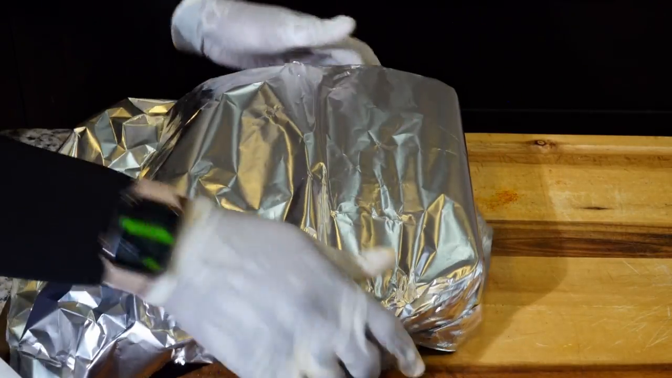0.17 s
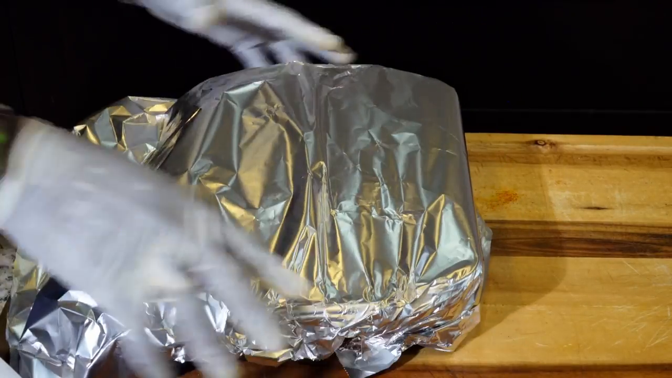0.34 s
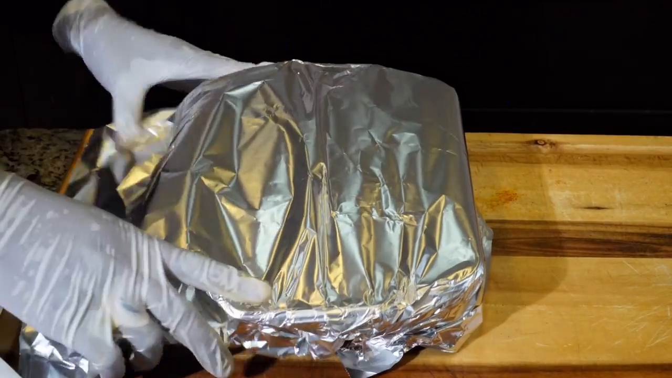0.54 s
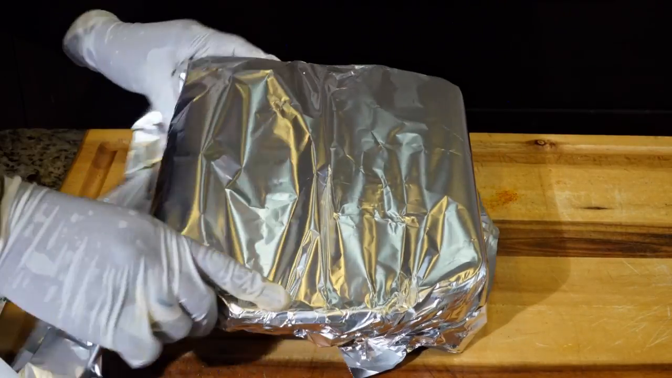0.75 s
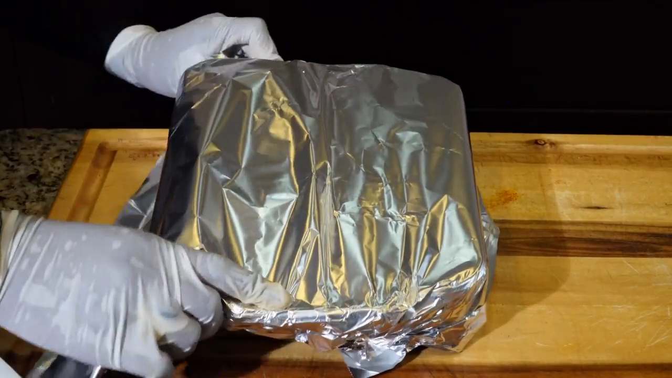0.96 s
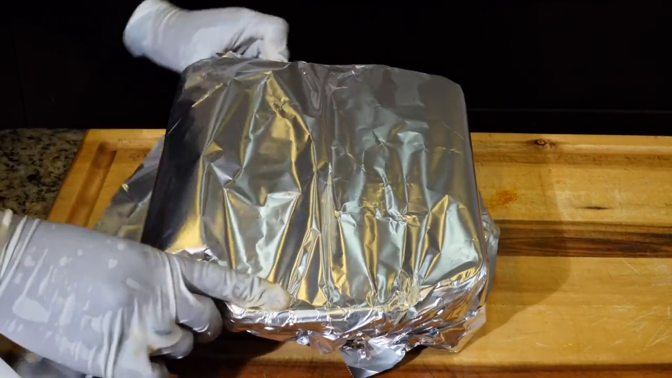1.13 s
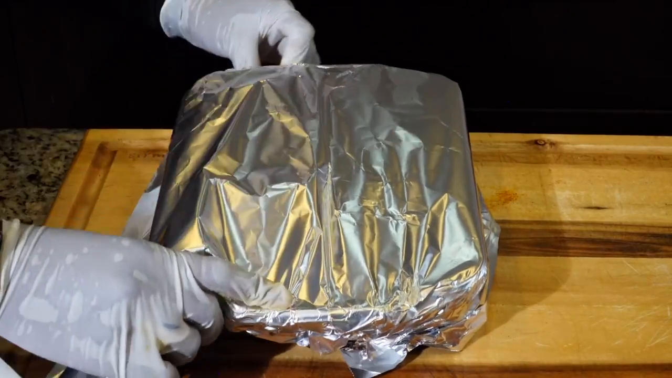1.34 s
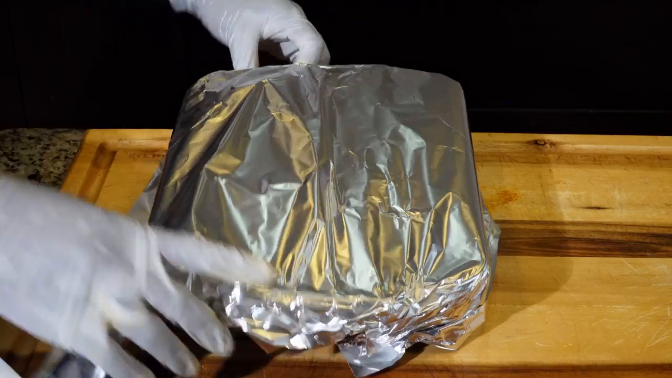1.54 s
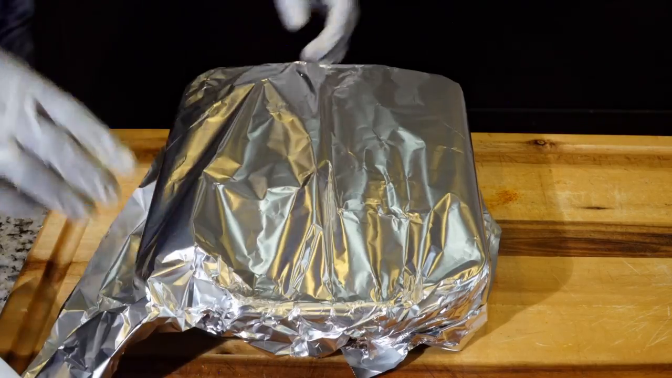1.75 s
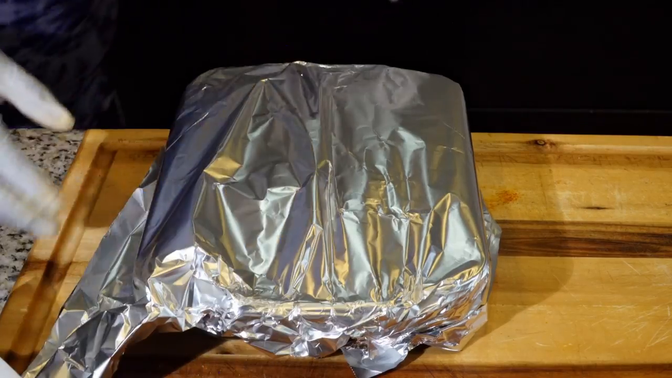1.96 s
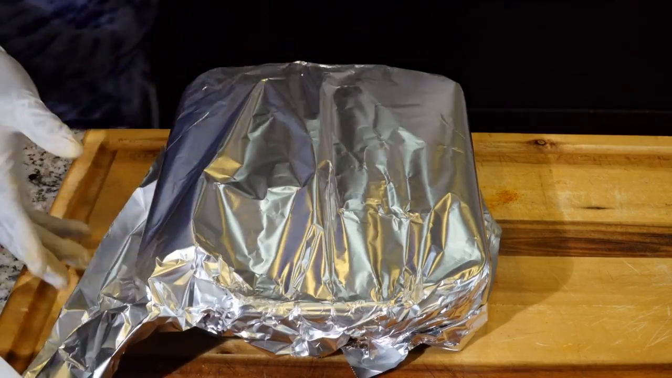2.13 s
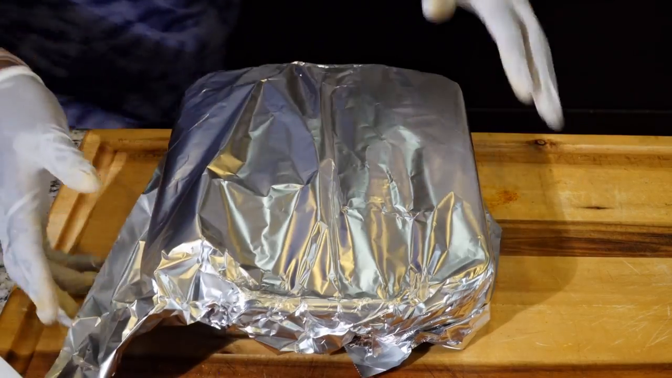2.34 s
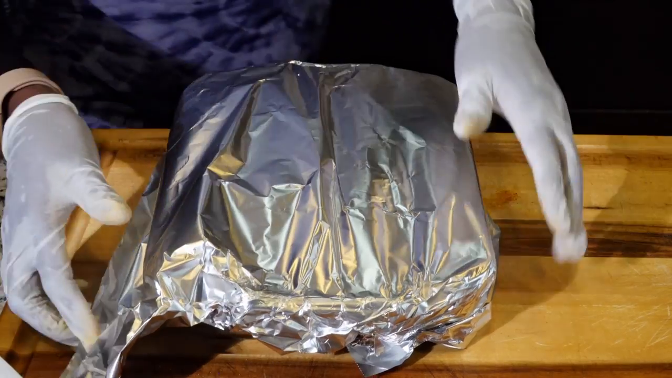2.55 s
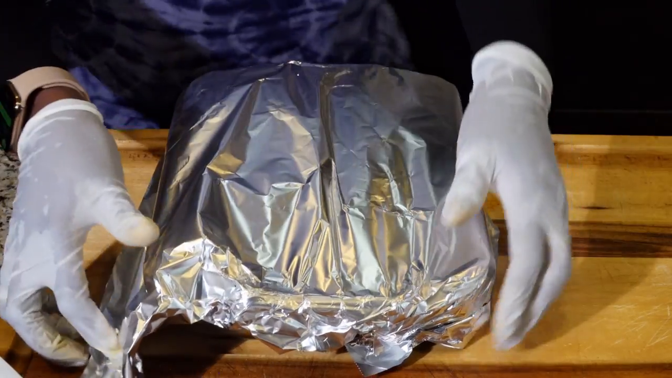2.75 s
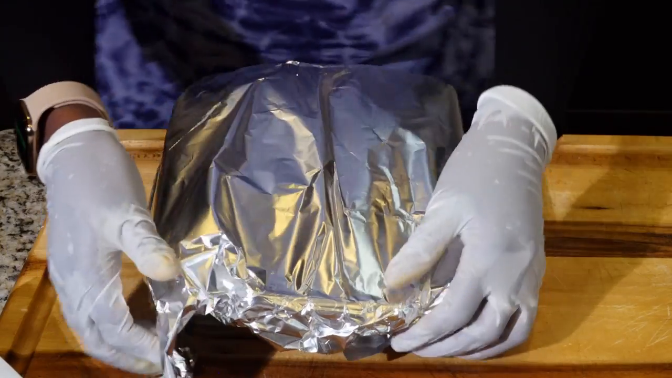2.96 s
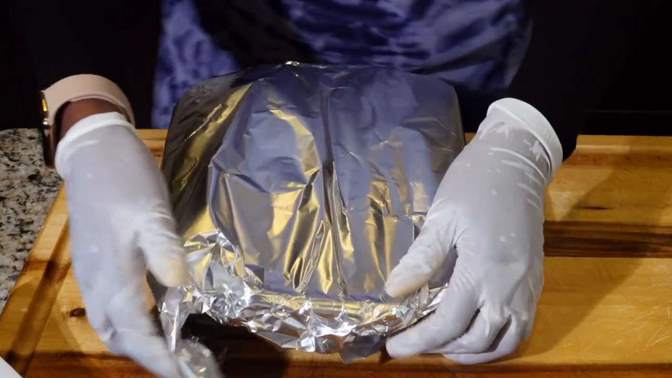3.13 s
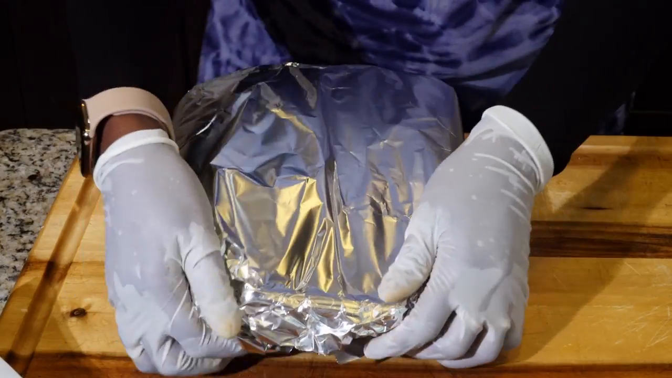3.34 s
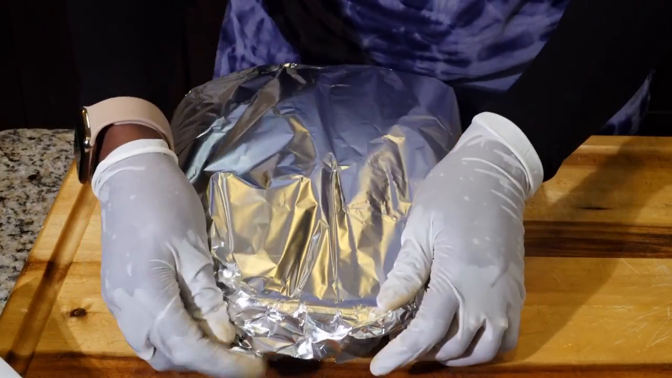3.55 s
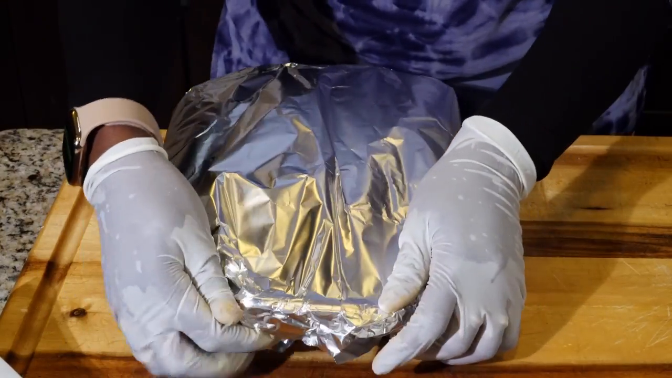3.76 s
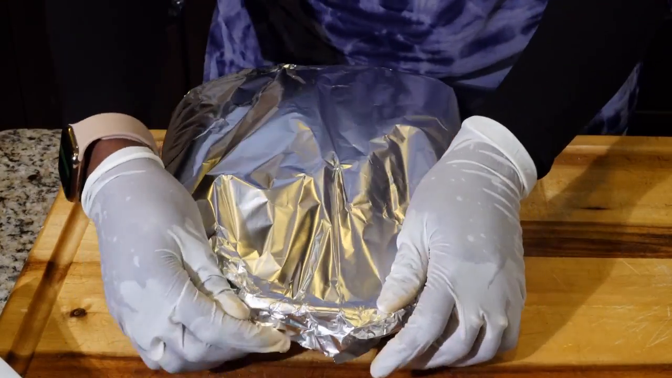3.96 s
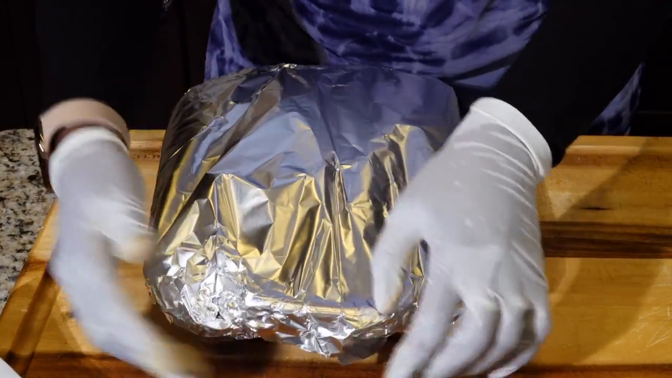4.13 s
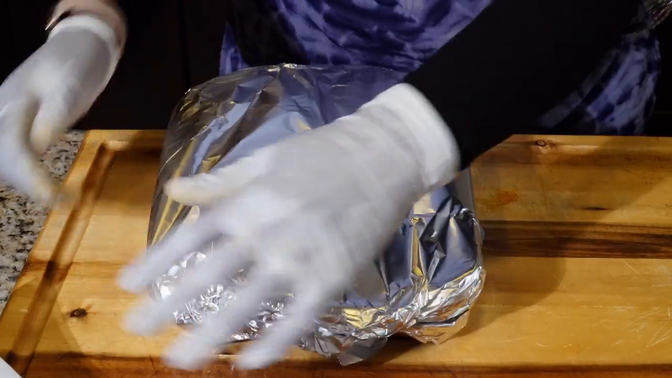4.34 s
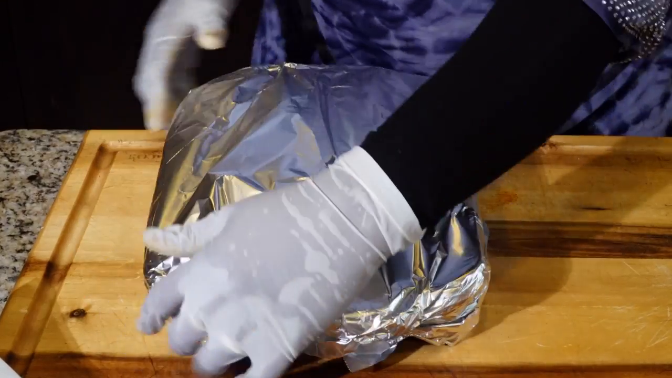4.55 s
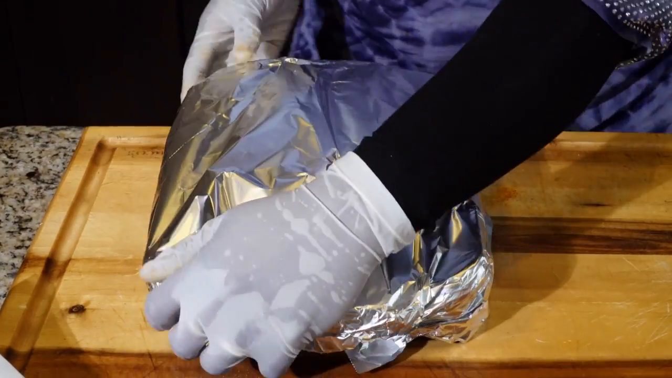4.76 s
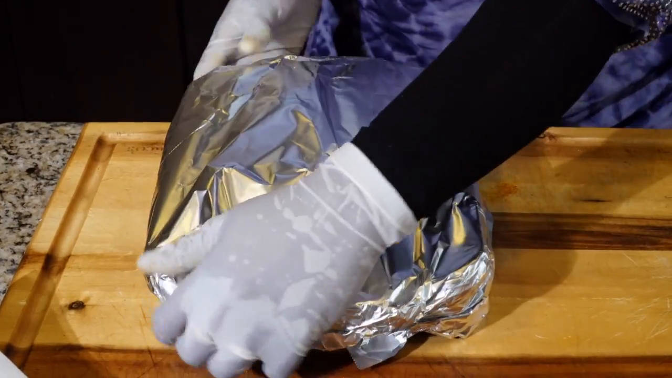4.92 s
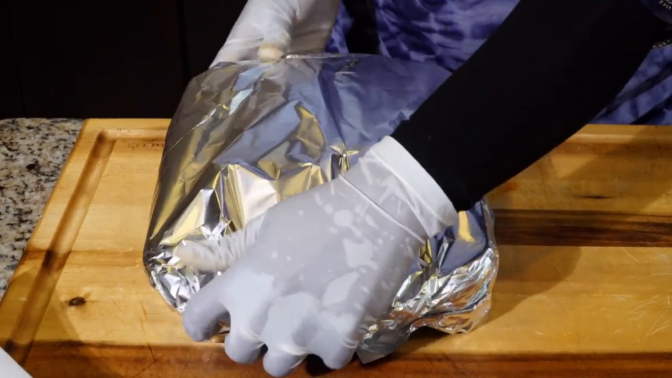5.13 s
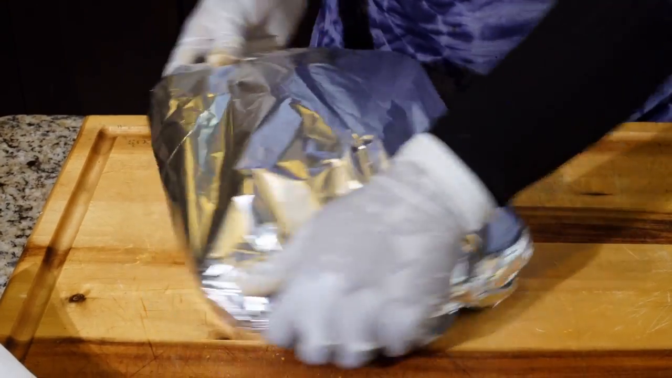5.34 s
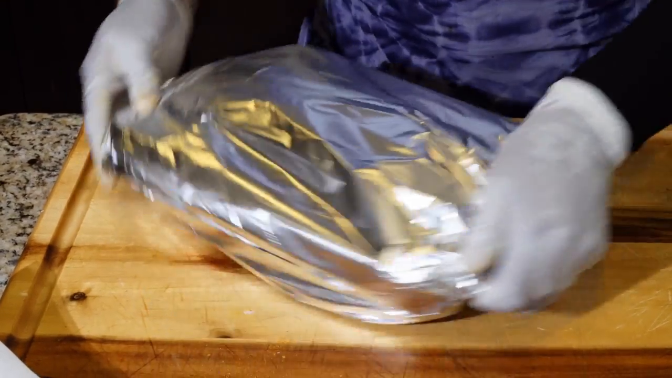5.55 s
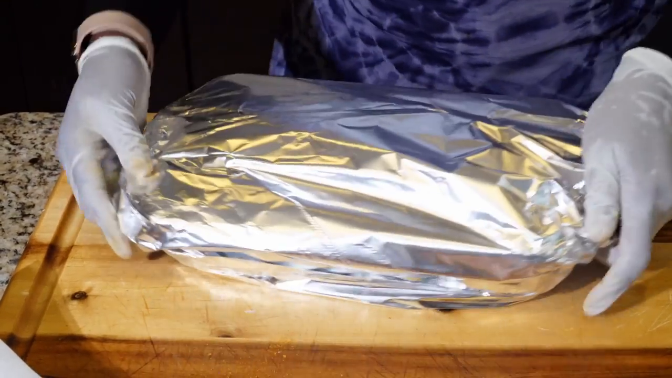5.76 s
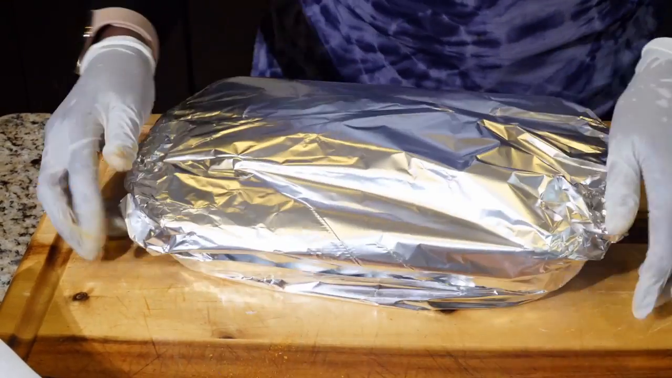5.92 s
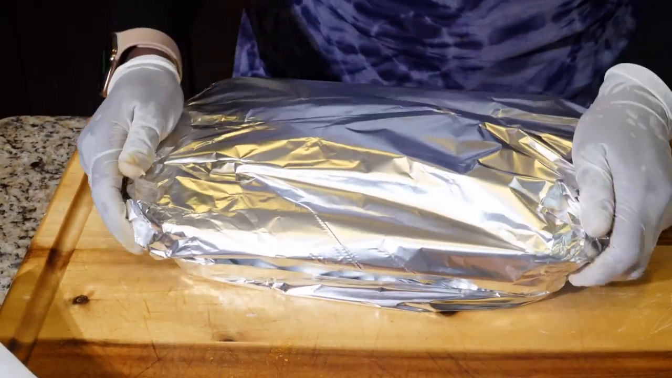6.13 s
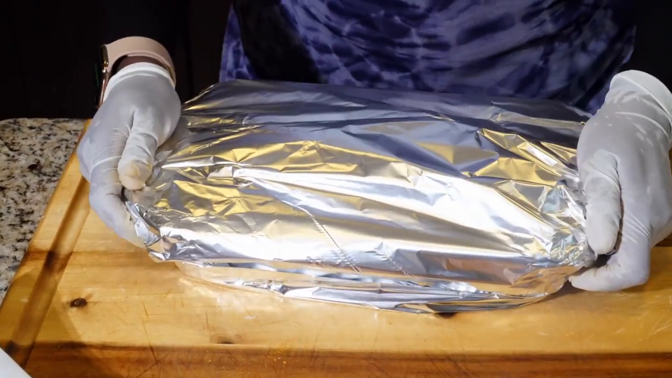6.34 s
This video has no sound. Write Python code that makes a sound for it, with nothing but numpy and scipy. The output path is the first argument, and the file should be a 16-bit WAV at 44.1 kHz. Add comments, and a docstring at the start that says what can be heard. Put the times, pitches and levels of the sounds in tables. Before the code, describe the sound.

Close, bright foil rustling in short uneven bursts, thinning to small crackles, before a covered dish slides across a wooden board and clunks down.

```python
"""Wrapping a glass dish in foil

Gloved hands pull aluminium foil over a glass baking dish, crimp it round the rim and press it flat.
The foil is shaped noise with many tiny pops; larger creases, flips and a singing fold are added one by one.
The wrapped dish is then swung round on a wooden board: scraping noise, and one knock that rings the glass.
A small kitchen adds a short tail and a low hum; the left channel is louder than the right."""
import sys
import numpy as np
from scipy import signal
from scipy.fft import rfft, irfft, next_fast_len
from scipy.io import wavfile
from scipy.ndimage import uniform_filter1d, map_coordinates

SR = 44100
rng = np.random.default_rng(int(sys.argv[2]) if len(sys.argv) > 2 else 0)


def transcribe(u):
    """Save the signal u as a 16-bit wav file named by the first command-line argument.

    u: samples, shape (n,) or (channels, n), limited to [-1, 1]; the rate is SR.
    q: integer samples, one column per channel.
    """
    v = np.clip(np.atleast_2d(u).T, -1, 1)
    q = np.round(v * 32767).astype(np.int16)
    wavfile.write(sys.argv[1], SR, q)


N = 281791  # length of the scene in samples

# All levels are relative: they come before the mixing gains and the left/right balance.
# Tone of the kitchen hum: pitch_hz, level_db
HUM_TONE = [(12, -36), (20, -28), (77, 7.5), (107, 3.5), (172, -6), (347, -11), (422, -22), (678, -13.5),
            (1000, -20.5), (1530, -19.5), (1660, -22), (8180, -45), (13500, -33), (16000, -47)]
# How long the kitchen tail takes to fall by 60 dB: pitch_hz, decay_s
ROOM_DECAY = [(200, 0.37), (2000, 0.11), (14000, 0.23)]
# Soft bumps of the dish on the board: start_s, level_db, pitch_hz
BUMPS = [(0.62, -27, 118), (0.808, -30, 67.3), (1.94, -31, 159), (1.985, -26, 120), (2.055, -31, 91.5),
         (2.541, -30, 45.8), (4.434, -24, 54.3), (4.574, -32, 87), (5.682, -24.5, 82.4)]
# The whole sheet flexes, under a palm or as the dish lands: start_s, length_s, level_db
FLEXES = [(0.0, 0.04, -44), (0.53, 0.082, -35), (0.78, 0.11, -36.5), (1.22, 0.067, -35), (1.92, 0.083, -35),
          (2.09, 0.06, -43.5), (2.39, 0.16, -46.5), (2.55, 0.067, -35.5), (2.96, 0.1, -40),
          (3.9, 0.039, -40.5), (4.42, 0.097, -35), (4.57, 0.059, -32), (5.18, 0.029, -32),
          (5.675, 0.035, -35.5)]
# Tone of the dull flutter: pitch_hz, level_db
FLUTTER_TONE = [(20, -4), (60, -5.5), (130, 0), (300, -4), (550, -11), (1200, -21), (3000, -68)]
# The dish slides on the board, one list per push: time_s, scrape_level_db, hiss_level_db
SLIDES = [
    [(5.3, -37, -72), (5.37, -29.5, -20.5), (5.41, -29, -18.5), (5.44, -26.5, -21.5), (5.465, -29, -15.5),
     (5.54, -31, -15), (5.575, -37, -34)],
    [(5.735, -56, -35), (5.755, -31.5, -20.5), (5.815, -31, -26), (5.87, -43, -41)],
]
# Tone of the foil scraping on wood: pitch_hz, level_db
SCRAPE_TONE = [(180, -52), (300, -26), (398, -46), (455, -11), (546, 2), (645, -10), (762, -1), (1930, -5),
               (2280, -8), (2700, 0.5), (4750, -19.5), (6960, -13.5), (8090, -13), (15000, -9),
               (16000, -16)]
# The dish comes down: start_s, level_db
KNOCKS = [(5.682, -4.5)]
# Ringing tones of the glass dish on the board: pitch_hz, level_db, time_to_fall_60_db_s
DISH_RING = [(355, -27, 0.25), (451.5, -4.5, 0.21), (442.3, -15.5, 0.53), (483, -12.5, 0.47),
             (553, -24, 0.67), (634, -25, 0.66), (715, -26, 0.38), (838, -10.5, 0.17), (942, -15, 0.13),
             (1139, -13, 0.11), (1200, -15, 0.19), (1280, -13, 0.13), (1350, -16, 0.28), (1540, -33, 0.084),
             (1920, -25, 0.1)]
# Tones of the board's thud and of the hard clack: pitch_hz, level_db
BOARD_TONE = [(40, -36), (90, -23), (250, -38), (440, -6), (700, -9), (1500, -3.5), (1900, -30),
              (5000, -36)]
CLACK_TONE = [(150, -32), (500, -4), (1500, 5), (2000, -6.5), (5000, -16.5), (16000, -39)]
# A glove drags along a taut fold, which sings hoarsely: time_s, pitch_hz, level_db
DRAG_PATH = [(2.64, 1550, -52), (2.76, 1640, -50), (2.919, 1720, -49), (3.08, 2000, -36)]
# A broad panel of the sheet flips over with one dull pop: start_s, peak_db, corner_hz
PANEL_POPS = [(2.1205, -17.5, 750), (4.0815, -21, 1200), (4.295, -26, 1400)]
# Single creases that snap through: start_s, level_db, facet_pitch_hz
CREASE_SNAPS = [(0.13, -24, 2650), (0.277, -17, 7150), (0.898, -9, 1790), (0.998, -14.5, 7000),
                (1.108, -10, 770), (1.291, -11.5, 1090), (1.353, -13.5, 4900), (2.477, -26.5, 3360),
                (3.008, -23, 14000), (3.168, -24.5, 4000), (3.738, -20.5, 2140), (4.7, -14, 2530),
                (4.789, -17, 2430), (4.819, -14.5, 2120), (4.882, -14.5, 2130), (4.901, -13, 2690),
                (4.974, -12.5, 2600), (5.078, -10, 1800), (5.081, -13, 2700), (5.106, -12.5, 13800),
                (5.148, -15.5, 2030), (5.168, -14.5, 1240), (5.604, -22, 2540), (5.834, -1.5, 13100),
                (6.195, -14, 2900), (6.339, -14, 2700)]
# How firmly the hands lean on the foil between strokes: time_s, level_db
GRIP = [(0.0, -34), (0.3, -41), (0.42, -53), (0.9, -29), (1.33, -35), (1.7, -39), (1.82, -55),
        (2.26, -60.5), (2.35, -49), (2.85, -43.5), (3.3, -36), (4.2, -47.5), (4.34, -59), (4.5, -38),
        (5.92, -38), (6.04, -58.5), (6.14, -36), (6.39, -36.5)]
# A hand pulls, pinches or smooths the foil: start_s, length_s, level_db, crackle_over_buckling_db
STROKES = [(0.0, 0.013, -29.5, -0.5), (0.11, 0.089, -30, -1), (0.22, 0.063, -34, 1.5),
           (0.53, 0.35, -27.5, 4.5), (1.15, 0.2, -30.5, 3.5), (1.555, 0.038, -40, 7.5),
           (1.62, 0.074, -33.5, 5), (1.77, 0.089, -65.5, 8.5), (1.925, 0.069, -40.5, -4),
           (2.325, 0.047, -44, 0), (2.465, 0.056, -46.5, 6), (2.55, 0.057, -38, -2), (2.885, 0.12, -38, 4),
           (2.985, 0.14, -30.5, 0), (3.24, 0.1, -36, 2.5), (3.41, 0.14, -33.5, -3),
           (3.685, 0.076, -38.5, -4), (3.845, 0.11, -36.5, -1.5), (4.08, 0.082, -35, -3),
           (4.17, 0.16, -50.5, -26), (4.415, 0.06, -41, -1.5), (4.575, 0.15, -29, -3.5),
           (4.75, 0.063, -33.5, 2), (4.87, 0.035, -32, 1), (4.955, 0.043, -33, -2), (5.095, 0.029, -35, 2),
           (5.17, 0.17, -34, 5), (5.59, 0.024, -38.5, 9.5), (5.88, 0.053, -30, -2.5),
           (6.145, 0.062, -33.5, 1.5)]
# A whole fold collapses under a finger: start_s, length_s, level_db, crackle_over_buckling_db
CRUNCHES = [(0.078, 0.027, -44, 11.5), (0.497, 0.034, -34.5, 2.5), (0.545, 0.024, -27, 3),
            (0.627, 0.017, -24.5, 8), (0.71, 0.034, -37, 13.5), (0.801, 0.018, -23.5, 2),
            (0.842, 0.011, -29.5, 5), (1.058, 0.043, -31.5, 2), (1.244, 0.037, -24, 4),
            (1.29, 0.022, -24.5, 2), (1.433, 0.0087, -36.5, 9), (2.11, 0.025, -50, -8),
            (2.277, 0.077, -53, 6.5), (2.692, 0.029, -37.5, -1.5), (2.812, 0.0094, -33.5, -1),
            (2.889, 0.021, -36.5, 3.5), (3.008, 0.0041, -29.5, 6.5), (3.165, 0.0041, -36, 8.5),
            (3.433, 0.015, -29.5, 2.5), (3.492, 0.034, -35.5, 4.5), (3.597, 0.032, -38, 5),
            (3.733, 0.013, -30, -3.5), (3.912, 0.019, -30.5, 1), (3.983, 0.012, -35, -1.5),
            (4.12, 0.012, -27, -2.5), (4.168, 0.025, -35, -2), (4.578, 0.035, -29, 4.5),
            (4.683, 0.022, -33, 2), (4.834, 0.014, -37.5, 11.5), (4.974, 0.0097, -25, 5.5),
            (5.005, 0.0086, -27.5, -2), (5.078, 0.0043, -21.5, -9), (5.249, 0.014, -40, 16),
            (6.077, 0.021, -38.5, -5.5), (6.254, 0.016, -33, 6), (6.299, 0.021, -36, 5)]
# Tones of the loose, the crimped and the taut foil: pitch_hz, level_db
LOOSE_TONE = [(150, -34), (250, -20), (460, -6), (662, -3.5), (816, -3.5), (1010, -0.5), (1790, 1),
              (2960, -2.5), (4900, 1.5), (8550, -3.5), (13700, -5), (16000, -9.5)]
CRIMPED_TONE = [(150, -17), (250, 0.5), (282, -7), (386, -6), (775, 0), (1310, -1), (2090, -0.5),
                (5440, -6), (10400, -7.5), (13900, -5.5), (16000, -12)]
TAUT_TONE = [(150, -43), (250, -11), (319, -7.5), (674, -4), (860, -0.5), (1350, -2), (2570, 1),
             (3580, -5.5), (4120, -4), (4990, -10), (12100, -4.5), (13400, -4.5), (16000, -8)]

TOP_HZ = 15950  # nothing is kept from here up
LEFT_DB = 10.4  # left channel over right
CRIMP_S, PRESS_S = 1.85, 4.35  # when the crimping and the pressing begin
# A firm grip and its extra fine crackle; a lighter grip is duller
FIRM_DB, FIRM_TREBLE_DB, TREBLE_PER_DB = -32, 0.5, 0.25
STROKE_ATTACK_S, STROKE_RELEASE_S = 0.012, 0.016
CRUNCH_ATTACK_S, CRUNCH_RELEASE_S = 0.00076, 0.0051
FLEX_ATTACK_S, FLEX_RELEASE_S = 0.014, 0.013
# Flutter under a firm grip; the power below 1 makes it grow more slowly than the effort
FIRM_FLUTTER_DB, FLUTTER_GROWS = -47, 0.37
# The finest creases: their band, and how they follow a change of effort
EDGE_HZ, MEMORY_S, EDGE_GROWS, EDGE_DB = 10100, 0.072, 0.25, -1.5


def amp(db):
    """Turn decibels into a gain."""
    return 10 ** (np.asarray(db) / 20)


def unit(x):
    """Scale a sound to an average (rms) strength of 1."""
    return x / np.sqrt(np.mean(x ** 2) + 1e-20)


def along(points, hz):
    """Read a value between (pitch, value) points, spaced by pitch ratio."""
    point_hz, values = np.transpose(points)
    return np.interp(np.log(hz + 1), np.log(point_hz + 1), values)


def gains(tables, fade_s=0.014):
    """Make one gain curve for each level column; every table fades in and out at its ends."""
    t, total = np.arange(N) / SR, 0
    for rows in tables:
        times, *levels_db = np.transpose(rows)
        inside_s = np.minimum(t - times[0], times[-1] - t)
        gate = np.sqrt(np.clip(.5 + inside_s / fade_s, 0, 1))
        total = total + gate * amp([np.interp(t, times, db) for db in levels_db])
    return total


def filtered(x, response):
    """Multiply each frequency of a sound by a response."""
    n = x.shape[-1]
    padded = next_fast_len(n + SR // 4)
    hz = np.fft.rfftfreq(padded, 1 / SR)
    return irfft(rfft(x, padded) * response(hz), padded)[..., :n]


def coloured(x, tone):
    """Give a sound the tone in a table, at rms 1."""
    return unit(filtered(x, lambda hz: amp(along(tone, hz))))


def even(x, size=1700):
    """Level out the slow loudness changes over about size samples; the faster grain stays."""
    power = uniform_filter1d(uniform_filter1d(x * x, size), size // 2)
    return x / np.sqrt(np.abs(power) + 1e-12)


def add(track, start_s, sound):
    """Mix a sound into the track at its start time."""
    part = track[max(round(start_s * SR), 0):][:len(sound)]
    part += sound[:len(part)]


def swells(rows, attack_s, release_s):
    """Gain of events that rise, hold and die away; where they overlap their powers add."""
    power = np.zeros(N)
    for start_s, length_s, db in rows:
        t = np.arange(int((length_s + 10 * release_s) * SR)) / SR
        rise = np.minimum(t / attack_s, 1)
        fall = np.exp(-np.maximum(t - length_s, 0) / release_s)
        add(power, start_s, (amp(db) * rise * fall) ** 2)
    return np.sqrt(power)


def avalanches(rate, spread_db, life_s):
    """Activity of the sheet: creases give way at random moments, and each burst dies down."""
    strength = amp(spread_db * np.clip(rng.standard_normal(N), -2, 2))
    starts = (rng.random(N) < rate / SR) * strength  # rate is bursts per second
    power = signal.lfilter([1], [1, -np.exp(-2 / (life_s * SR))], starts ** 2)
    return unit(np.sqrt(power))


def bending(x, rate=55):
    """As the sheet bends, its resonances shift and its top octave glints and dulls at random."""
    depth_db, glint_db = 1.5, 2.4
    hz, t, z = signal.stft(x, SR, nperseg=256)
    # Smooth random maps, read at rate steps per second
    places = np.meshgrid(np.sqrt(hz) / 4, t * rate, indexing="ij")
    resonances = map_coordinates(rng.standard_normal((40, 512)), places, mode="wrap")
    glints = map_coordinates(rng.standard_normal(512), [t * rate], mode="wrap")
    glints = glints * (hz[:, None] / TOP_HZ) ** 2  # strongest at the top
    gain = amp(depth_db * resonances + glint_db * glints)
    return signal.istft(z * gain, SR, nperseg=256)[1][:N]


def split(x, levels, edge_hz=5000):
    """Broad facets fill the middle and fine creases the treble, each with its own level curve."""
    low = filtered(x, lambda hz: 1 / (1 + (hz / edge_hz) ** 8))
    return levels[0] * even(low) + levels[1] * even(x - low)


def hum():
    """The low kitchen hum is steady noise with most of its strength in the bass."""
    return coloured(rng.standard_normal(N), HUM_TONE)


def kitchen(x):
    """Hard walls return a short tail in which each frequency dies at its own speed."""
    hz, t, z = signal.stft(rng.standard_normal(SR // 2), SR, nperseg=256)
    decay = amp(-60 * t / along(ROOM_DECAY, hz)[:, None])
    tail = signal.istft(z * decay, SR, nperseg=256)[1]
    delayed = np.pad(x, (SR // 200, 0))  # 5 ms
    return signal.fftconvolve(delayed, tail / np.linalg.norm(tail))[:N]


def bumps(life_s=0.019):
    """Gloves nudge the dish against the board: each nudge is a low tone that dies quickly."""
    track, t = np.zeros(N), np.arange(SR // 8) / SR
    for start_s, db, hz in BUMPS:
        add(track, start_s, amp(db) * np.sin(2 * np.pi * hz * t) * np.exp(-t / life_s))
    return track


def flutter(work):
    """The whole sheet flexes with a dull flutter: bursts of low noise that follow the hands."""
    bursts = rng.standard_normal(N) * avalanches(rate=120, spread_db=5, life_s=0.01)
    following = amp(FIRM_FLUTTER_DB) * (work[0] / amp(FIRM_DB)) ** FLUTTER_GROWS
    flexing = swells(FLEXES, FLEX_ATTACK_S, FLEX_RELEASE_S)
    return np.hypot(following, flexing) * even(coloured(bursts, FLUTTER_TONE))


def dish_ring():
    """The glass dish answers one blow with many fading tones, damped by board and hands."""
    t = np.arange(SR // 2) / SR
    return sum(amp(db - 60 * t / t60) * np.sin(2 * np.pi * hz * t) for hz, db, t60 in DISH_RING)


def noise_burst(tone, life_s, t):
    """A blow's noise has a set tone and fades away exponentially."""
    noise = coloured(rng.standard_normal(len(t)), tone)
    return even(noise, size=200) * np.exp(-t / life_s)


def knock(ring_db=-1, clack_db=3, clack_life_s=0.0047, board_db=-6, board_life_s=0.013):
    """The dish lands: a hard clack, the short thud of the board and the longer ring of the glass."""
    track, ring = np.zeros(N), dish_ring()
    t = np.arange(len(ring)) / SR
    clack = amp(clack_db) * noise_burst(CLACK_TONE, clack_life_s, t)
    thud = amp(board_db) * noise_burst(BOARD_TONE, board_life_s, t)
    blow = clack + thud + amp(ring_db) * ring
    for start_s, db in KNOCKS:
        add(track, start_s, amp(db) * blow)
    return track


def slide(glass_db=-6, scrape_db=1):
    """Foil under the dish scrapes over the wood grain and sets the glass singing faintly."""
    levels = gains(SLIDES)
    catches = 1 + .7 * avalanches(rate=260, spread_db=4, life_s=.004)
    rub = rng.standard_normal(N) * catches
    glass = even(signal.fftconvolve(rub, dish_ring())[:N])
    scrape_levels = levels * amp([[scrape_db], [0]])  # the hiss keeps its level
    scrape = split(bending(coloured(rub, SCRAPE_TONE)), scrape_levels)
    return scrape + amp(glass_db) * levels[0] * glass


def drag(width_hz=130):
    """Stick and slip of the glove feed one resonance of the fold, which rises as the foil tightens."""
    times, hz, db = np.transpose(DRAG_PATH)
    phase = 2 * np.pi * np.cumsum(np.interp(np.arange(N) / SR, times, hz)) / SR
    # Two slow noises on a gliding tone make a narrow, hoarse band
    noises = rng.standard_normal((2, N))
    a, b = filtered(noises, lambda f: 1 / (1 + (f / width_hz) ** 2))
    voice = unit(a * np.cos(phase) + b * np.sin(phase))
    return gains([np.transpose([times, db])])[0] * voice


def pops():
    """Each flip of a panel pushes the air once and draws it back; nothing rings."""
    track, t = np.zeros(N), np.arange(SR // 50) / SR
    for start_s, db, hz in PANEL_POPS:
        u = 2 * np.pi * hz * t
        push = u * (1 - u / 2) * np.exp(-u)
        add(track, start_s, amp(db) * push / push.max())
    return track


def snaps(crack_db=-2, ring_life_s=0.0018, crack_life_s=0.00043, octaves=0.21, reach=6, boost_db=3, size=900):
    """A crease snaps: its facet rings for milliseconds under a crack that is duller for broad facets."""
    track, t = np.zeros(N), np.arange(size) / SR
    for start_s, db, hz in CREASE_SNAPS:
        a, b = rng.standard_normal((2, size))
        ring = filtered(a, lambda f: np.exp(-.5 * (np.log2((f + 1) / hz) / octaves) ** 2))
        crack = filtered(b, lambda f: f / (f + hz / 2) / np.hypot(1, (f / (reach * hz)) ** 2))
        snap = even(ring, size=80) * np.exp(-t / ring_life_s)
        snap = snap + amp(crack_db) * even(crack, size=40) * np.exp(-t / crack_life_s)
        add(track, start_s, amp(db + boost_db) * snap / np.abs(snap).max())
    return track


def moves(rows, attack_s, release_s):
    """Hand moves give two gains: one for the buckling and one for the fine crackle."""
    start_s, length_s, db, treble_db = np.transpose(rows)
    levels = (db, db + treble_db)
    return np.array([swells(zip(start_s, length_s, level), attack_s, release_s) for level in levels])


def effort():
    """Grip, strokes and collapsing folds set the gains of buckling and fine crackle; powers add."""
    grip_db = np.interp(np.arange(N) / SR, *np.transpose(GRIP))
    crackle_db = grip_db + FIRM_TREBLE_DB + TREBLE_PER_DB * (grip_db - FIRM_DB)
    grip = amp([grip_db, crackle_db])
    strokes = moves(STROKES, STROKE_ATTACK_S, STROKE_RELEASE_S)
    folds = moves(CRUNCHES, CRUNCH_ATTACK_S, CRUNCH_RELEASE_S)
    return np.sqrt(grip ** 2 + strokes ** 2 + folds ** 2)


def facets(activity, rate, spread_db, cycles, count=16000, size=260):
    """Small stiff facets pop over, each ringing for a few cycles at its own pitch."""
    when, pitch, strength, chance = rng.random((count, 4)).T
    start = (when * (N - size)).astype(int)
    # The square root favours high pitches
    hz = np.geomspace(500, 16000, 512)[(np.sqrt(pitch) * 512).astype(int)]
    chosen = chance < rate * N / SR / count  # about rate pops per second
    height = amp(-spread_db * np.log(strength + .02)) * activity[start] * hz ** .75 * chosen
    turns = hz[:, None] * np.arange(size) / SR
    rings = height[:, None] * np.sin(2 * np.pi * turns) * np.exp(-turns / cycles)
    places = start[:, None] + np.arange(size)
    return unit(np.bincount(places.ravel(), rings.ravel(), N))


def crinkle(levels, tone, activity, rub_db, facet_db):
    """Avalanches of tiny ticks and facet pops lie over the rub of foil on foil."""
    uneven = amp(1.03 * rng.standard_normal(N))
    ticks = unit(rng.standard_normal(N) * uneven) * activity
    facet_pops = facets(activity, rate=1300, spread_db=4.5, cycles=1.74)
    rub = rng.standard_normal(N)
    sheet = ticks + amp(facet_db) * facet_pops + amp(rub_db) * rub
    return split(bending(coloured(sheet, tone)), levels)


def edge(x, fine):
    """The finest creases give way while the effort rises and stop first as the hands ease off."""
    keep = np.exp(-1 / (MEMORY_S * SR))
    recent = signal.lfilter([1 - keep], [1, -keep], fine - fine[0]) + fine[0]
    top = filtered(x, lambda hz: 1 - 1 / (1 + (hz / EDGE_HZ) ** 10))
    top_gain = amp(EDGE_DB) * np.minimum(fine / recent, 2) ** EDGE_GROWS
    return x + top * (top_gain - 1)


def foil(work):
    """The loose sheet rustles densely; crimped and pressed, it crackles in more separate bursts."""
    stage = np.digitize(np.arange(N) / SR, [CRIMP_S, PRESS_S])
    loose_bursts = avalanches(rate=360, spread_db=3.5, life_s=0.0088)
    loose = crinkle(work * (stage == 0), LOOSE_TONE, loose_bursts, rub_db=-1, facet_db=-3.5)
    crimped_bursts = avalanches(rate=210, spread_db=0.5, life_s=0.009)
    crimped = crinkle(work * (stage == 1), CRIMPED_TONE, crimped_bursts, rub_db=-0.5, facet_db=-3)
    taut_bursts = avalanches(rate=170, spread_db=5.5, life_s=0.008)
    taut = crinkle(work * (stage == 2), TAUT_TONE, taut_bursts, rub_db=-0.5, facet_db=-3)
    return edge(loose + crimped + taut, work[1])


def scene(room_db=-15, hum_db=-45):
    """Everything reaches one microphone, which feeds the two channels unequally."""
    work = effort()
    dish = bumps() + knock() + slide()
    sheet = flutter(work) + drag() + pops() + snaps() + foil(work)
    near = dish + sheet
    mono = near + amp(room_db) * kitchen(near) + amp(hum_db) * hum()
    sides = np.array([[amp(LEFT_DB)], [1]])
    return mono * sides / sides.mean()


def record(dry):
    """The recorder clips at full scale, then keeps nothing from its band limit up."""
    return filtered(np.clip(dry, -1, 1), lambda hz: hz < TOP_HZ)


dry = scene()
out = record(dry)
transcribe(out)
```